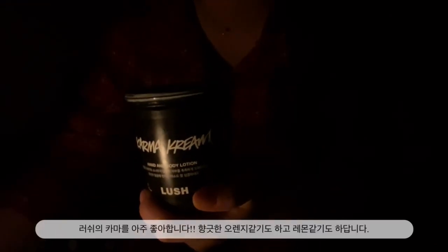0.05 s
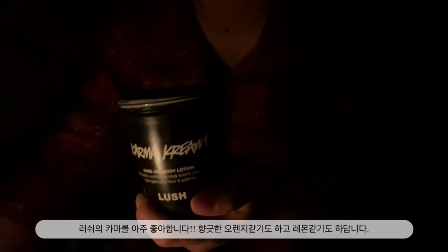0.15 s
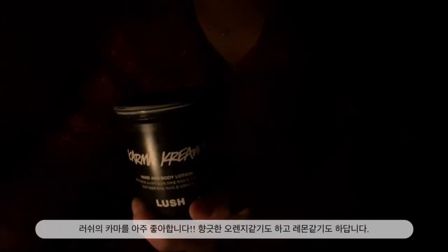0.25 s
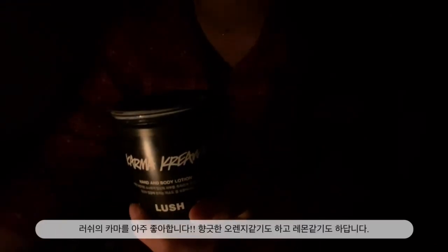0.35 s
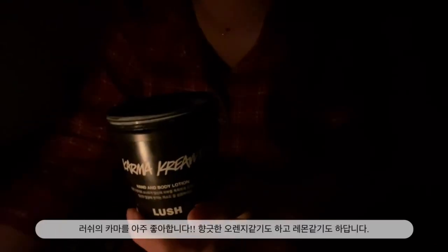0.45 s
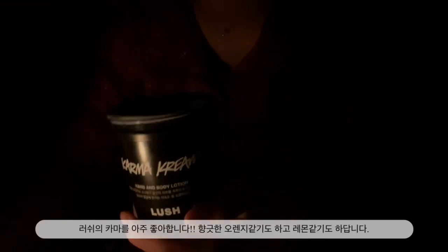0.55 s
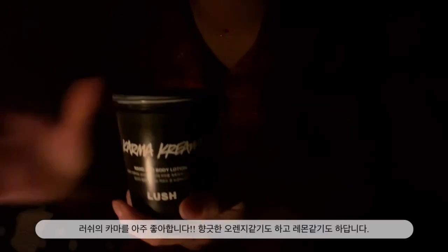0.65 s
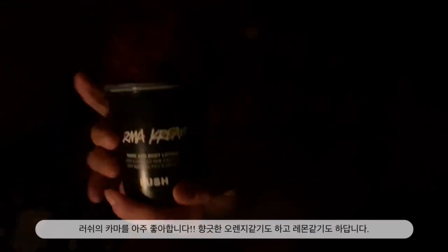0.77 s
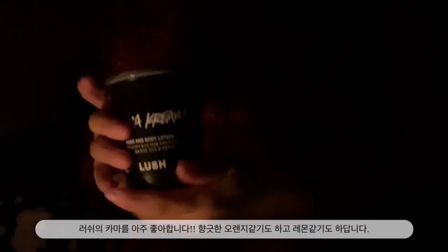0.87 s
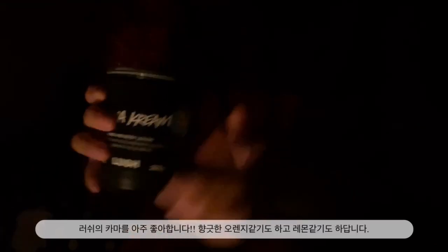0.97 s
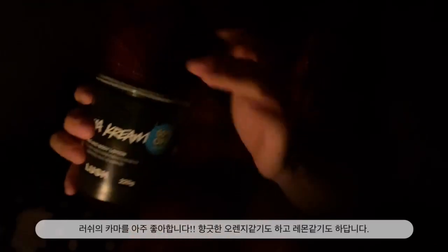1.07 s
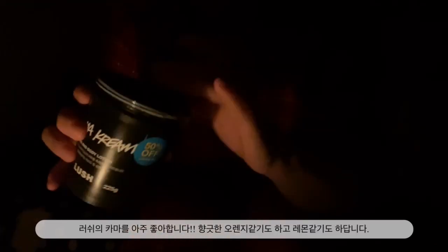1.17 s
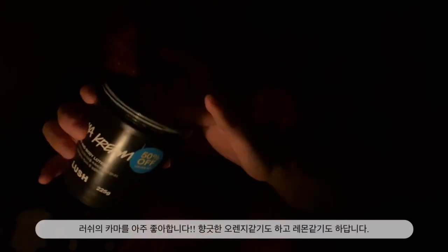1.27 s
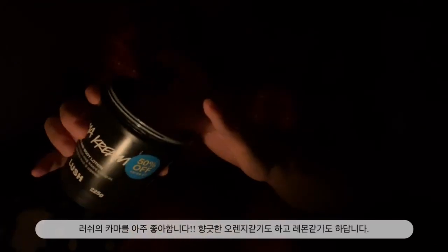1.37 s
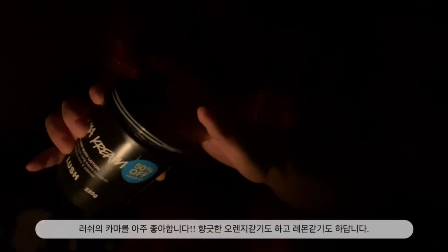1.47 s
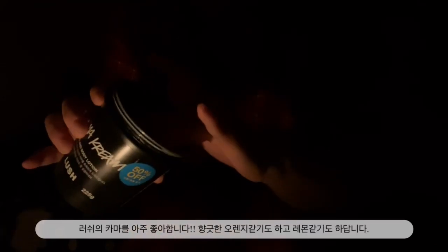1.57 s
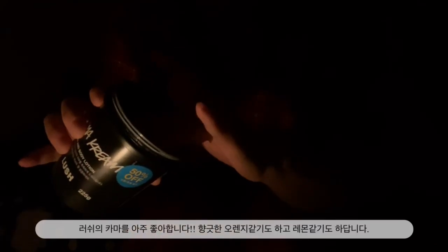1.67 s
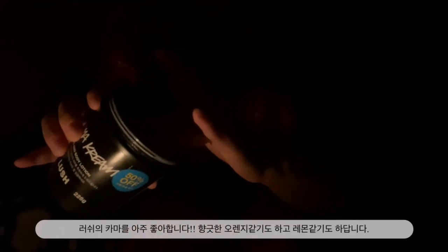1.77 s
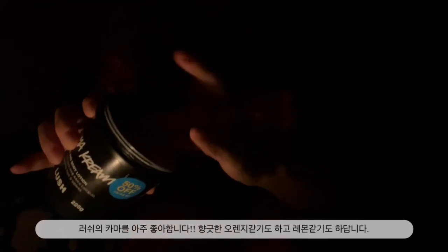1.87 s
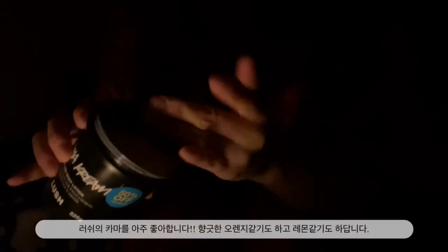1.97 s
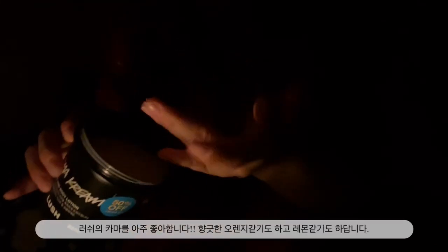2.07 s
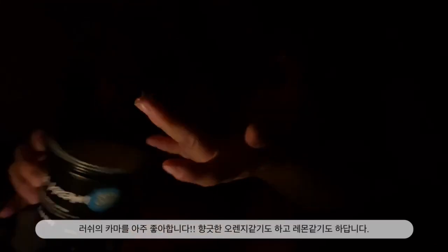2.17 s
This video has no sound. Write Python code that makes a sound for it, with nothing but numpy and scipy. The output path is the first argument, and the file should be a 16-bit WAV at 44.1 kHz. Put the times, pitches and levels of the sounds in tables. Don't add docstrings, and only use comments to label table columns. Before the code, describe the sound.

A plastic tub's screw lid is opened close to stereo microphones. At 0.23 seconds a short click and thread scrape; at 0.43 to 0.51 a louder hollow snap with rapid rattling, then a soft low table thud around 0.52 and a weaker one at 0.67. A brief dry palm slide with a tiny tick comes near 0.9. Quiet hiss and hum remain, with very faint skin rubbing from 1.9.

```python
import sys
import numpy as np
from scipy import signal
from scipy.fft import rfft, irfft, next_fast_len
from scipy.io import wavfile

SR = 44100
rng = np.random.default_rng(int(sys.argv[2]) if len(sys.argv) > 2 else 0)


def bounce(signal):
    frames = np.transpose(np.atleast_2d(signal))
    limited = np.clip(frames, -1, 1)
    pcm = np.round(limited * 32767).astype(np.int16)
    wavfile.write(sys.argv[1], SR, pcm)


def magnitude_from_level(level_db):
    exponent = np.asarray(level_db, float) / 20
    return 10 ** exponent


N = 97020

# (centre [Hz], width [Hz], rms level [dB])
HUM_RESONANCES = [(55.2, 5.9, -64), (96.84, 30, -66), (121.13, 3, -70.5), (252, 12, -86.5)]
# (frequency [Hz], density [dB per Hz])
HISS_SPECTRUM = [(76, -26.5), (130, 0), (147, -26), (238, -18.5), (279, -21), (427, -24), (511, -30),
                 (11400, -50.5), (16000, -62.5)]
# (frequency [Hz], level [dB])
RUMBLE_SPECTRUM = [(20, -32), (35, -8), (70, -0.5), (110, -3), (135, -16.5), (180, -28)]
HISS_DB, RUMBLE_DB = -75 + 5, -67.5
# (frequency [Hz], likeness [0-1])
COHERENCE = [(60, .85), (130, 0.44), (290, 0.71), (640, 0)]
# (frequency [Hz], left over right [dB])
AIR_BALANCE = [(60, 4.5), (110, 4.5), (200, -0.5), (700, -2), (2400, 0.5)]

# (time [s], level [dB])
GRIP_LEVEL = [
    (.765, -100),
    (.772, -73.5),
    (.83, -66.5),
    (.856, -71.5),
    (.872, -56.5),
    (.903, -56.5),
    (.911, -74),
    (.945, -77),
    (1.1, -90),
]
# (frequency [Hz], level [dB])
GRIP_SPECTRUM = [(700, -10), (1500, -9), (2400, -2.5), (4000, -4), (6800, -1), (9500, -2.5), (12000, 0),
                 (15500, -2)]
GRIP_DULL_POWER = 0.7
# (time [s], level [dB])
RUB_LEVEL = [
    (1.84, -105),
    (1.93, -86.5),
    (2.02, -81),
    (2.045, -83.5),
    (2.07, -90),
    (2.12, -82),
    (2.16, -83),
    (2.2, -92),
]
# (frequency [Hz], level [dB])
SKIN_SPECTRUM = [(2000, -22.5), (5000, -9), (8300, -0.5), (10500, -1.5), (13000, 0.5), (15500, -8)]
# (time [s], level [dB], frequency [Hz], decay [cycles])
SKIN_TICKS = [
    (.1916, -43, 14400, 7.3),
    (.825, -64, 1830, 17),
    (.9010, -35, 14200, 28),
    (.9720, -58.5, 5870, 25),
]

# (time [s], strength [dB], crack [dB], hollow modes [dB], body [0 seated, 1 loose, 2 tilted])
LID_CONTACTS = [(.2290, -44, -12, -8.5, 0), (0.2367, -19.5, -9, -7, 0), (0.2377, -18.5, -19, 2.5, 0),
                (.2450, -34.5, -14, -3, 0), (0.4282, -30, -20, -4.5, 1), (0.4342, -10.5, -3, -8, 1),
                (0.4359, -12.5, -9.5, -1, 1), (.4390, -18, -16, -1.5, 1), (0.4458, -24.5, -10.5, -3.5, 1),
                (0.4502, -24.5, -10.5, 0.5, 1), (0.4581, -25, -13.5, -4.5, 1),
                (0.4643, -23.5, -3.5, -6.5, 1), (0.4661, -21.5, -10.5, 1, 1), (0.4705, -26.5, -16, 7, 1),
                (0.4817, -16.5, -2.5, -9, 2), (.4828, -16.5, -14, 1, 2), (.4885, -25, -14.5, -4.5, 2),
                (0.4988, -25.5, -11, 1.5, 2), (.5070, -31.5, -12.5, 0, 2)]
# (frequency [Hz], level [dB], t60 [s], left over right [dB])
SEATED_MODES = [(275, -15, 0.061, 8), (455, -19, 0.075, 4), (645, -2, 0.013, 6.5), (750, -4, 0.03, 4),
                (884, -16, 0.05, -5.5), (1010, -13, .03, -3.5), (1650, -1.5, 0.03, 7),
                (1970, -5, .016, -4.5), (2480, -7, 0.02, 3.5), (2896.7, -6.5, .016, 5),
                (3202.5, -2.5, 0.02, 4.5), (3620, -9.5, 0.033, 2), (4700, -15, 0.013, 2)]
# (frequency [Hz], level [dB], t60 [s], left over right [dB])
LOOSE_MODES = [(267.4, -15.5, 0.12, 6.5), (686, -9, 0.085, 4), (881, -14.5, 0.056, -2),
               (991, -1.5, 0.045, -5), (1078.5, -7.5, 0.028, -3.5), (1599.5, -7, 0.029, 5),
               (1950.4, -4.5, .024, 3), (2346, -5.5, .018, 4), (2697, 0.5, 0.031, 5.5),
               (3171, -11, 0.024, 3), (3880, -7.5, 0.014, 5.5), (4400, -4, 0.014, 6),
               (6300, -16.5, 0.021, -3.5)]
# (frequency [Hz], level [dB], t60 [s], left over right [dB])
TILTED_MODES = [(182, -15.5, 0.021, 5.5), (282, -9.5, 0.036, 7), (340, -13, 0.056, 5.5),
                (712, -3.5, .045, 5), (890, -6, 0.034, -3), (992, -4, .03, -4), (1108.6, -9, .025, -4),
                (1694, -1.5, 0.025, 2.5), (2170, -1, 0.016, 5), (2380, -6.5, 0.015, 2),
                (2630, -8, .022, 1.5), (3700, -4.5, .014, 2.5), (4830, -9, .014, 1)]
HOLLOW_HZ = 1300
MODE_DETUNE = 0.008
# (frequency [Hz], level [dB])
CRACK_SPECTRUM = [(1500, -13), (3000, -3), (5500, -6.5), (7000, -7), (9000, -3), (10300, -1), (13000, -16),
                  (16000, -22.5)]
CRACK_HOLD_S, CRACK_T60_S = 0.0021, 0.00099
# (time [s], level [dB])
SCRAPE_LEVEL = [
    (.215, -89),
    (.233, -49),
    (.262, -47),
    (.30, -60),
    (.345, -64.5),
    (.415, -55),
    (.428, -44.5),
    (.44, -60.5),
]
# (frequency [Hz], level [dB])
SCRAPE_SPECTRUM = [(350, -19), (800, -0.5), (1300, -14.5), (1900, -3), (2600, -8), (4300, -15.5),
                   (6000, -20.5), (12000, -42.5)]
# (time [s], level [dB])
FINGER_LEVEL = [
    (.238, -61),
    (.30, -71),
    (.34, -89),
    (.39, -73.5),
    (.43, -73.5),
    (.52, -72.5),
    (.57, -76),
]
# (time [s], level [dB])
CLATTER_LEVEL = [
    (.432, -51.5),
    (.438, -34),
    (.46, -39),
    (.478, -43),
    (.50, -40),
    (.53, -59.5),
    (.58, -83),
    (.62, -96),
]
# (frequency [Hz], level [dB])
CLATTER_SPECTRUM = [(260, -12), (520, -26.5), (690, -5), (1000, 0), (1350, -12), (2300, 1), (4300, -4.5),
                    (14000, -35.5)]
LID_LAG_S, PALM_LAG_S = 0.0005, -0.000057

# (time [s], level [dB], frequency [Hz], t60 [s])
TABLE_THUDS = [
    (.235, -49, 93.8, 0.43),
    (.44, -49, 108.6, 0.17),
    (0.523, -38, 92.5, 0.19),
    (.665, -47.5, 91.6, 0.18),
]

# (frequency [Hz], t60 [s])
ROOM_T60 = [(100, 0.18), (300, 0.31), (700, 0.17), (2000, 0.18), (6000, .21), (14000, 0.14)]
# (frequency [Hz], level [dB])
ROOM_SPECTRUM = [(300, 1.5), (700, -3), (2000, 1.5), (6000, -1.5), (11000, -12.5), (15000, -17)]
TUB_ROOM_DB, HAND_ROOM_DB, ROOM_GAP_S = -7, -13, 0.004

MERGE_HZ, MERGE_WIDTH_HZ, IN_STEP_HZ, TURN_HZ = 6790, 500, 11970, 5640
TOP_HZ = 15900


def unit(x):
    return x / np.sqrt(np.mean(x ** 2) + 1e-20)


def along(points, hz):
    f, value = np.transpose(points)
    return np.interp(np.log(hz + 1), np.log(f + 1), value)


def level(rows):
    s, db = np.transpose(rows)
    return magnitude_from_level(np.interp(np.arange(N) / SR, s, db, left=-140, right=-140))


def filtered(x, response):
    size = next_fast_len(x.shape[-1] + 8192)
    spectrum = rfft(x, size) * response(np.fft.rfftfreq(size, 1 / SR))
    return irfft(spectrum, size)[..., :x.shape[-1]]


def apart(x, lag_s):
    sides = np.array([[-1], [1]])
    return filtered(x, lambda hz: np.exp(-1j * np.pi * hz * lag_s * sides))


def friction(spectrum, grain_db, alike):
    slip = 40
    strength = np.repeat(magnitude_from_level(grain_db * rng.standard_normal(N // slip + 1)), slip)[:N]
    a, b = rng.standard_normal((2, N)) * strength
    angle = np.arccos(np.clip(alike, 0, 1)) / 2
    mid, side = np.cos(angle) * a, np.sin(angle) * b
    return unit(filtered(np.array([mid + side, mid - side]), lambda hz: magnitude_from_level(along(spectrum, hz))))


def air():
    hiss, rumble = rng.standard_normal((2, 2, N))
    pair = magnitude_from_level(HISS_DB) * unit(filtered(hiss, lambda f: magnitude_from_level(along(HISS_SPECTRUM, f)) * (f > 100)))
    pair += magnitude_from_level(RUMBLE_DB) * unit(filtered(rumble, lambda f: magnitude_from_level(along(RUMBLE_SPECTRUM, f) - 60 * (f > 250))))
    for hz, width, db in HUM_RESONANCES:
        noise = rng.standard_normal((2, N))
        pair += magnitude_from_level(db) * unit(filtered(noise, lambda f: 1 / (1 + (2 * (f - hz) / width) ** 2)))
    angle = lambda f: np.arccos(np.clip(along(COHERENCE, f), -1, 1)) / 2
    mid, side = filtered(pair, lambda f: np.array([np.cos(angle(f)), np.sin(angle(f))]))
    sides = np.array([[1], [-1]])
    return filtered(np.array([mid + side, mid - side]), lambda f: magnitude_from_level(along(AIR_BALANCE, f) / 2 * sides))


def skin():
    grip = level(GRIP_LEVEL)
    slide = friction(GRIP_SPECTRUM, grain_db=2.5, alike=0.7)
    low = filtered(slide, lambda hz: 1 / (1 + (hz / 2800) ** 6))
    pressed_low = low * (grip / grip.max()) ** GRIP_DULL_POWER
    out = grip * (slide - low + pressed_low) * magnitude_from_level([[-1], [1]])
    out += level(RUB_LEVEL) * friction(SKIN_SPECTRUM, grain_db=0.5, alike=0.5)
    for s, db, hz, cycles in SKIN_TICKS:
        u = np.maximum(np.arange(N) / SR - s, 0)
        rise = 1 - np.exp(-8 * u * hz / cycles)
        out += magnitude_from_level(db - 30 * u * hz / cycles) * rise * np.sin(2 * np.pi * hz * u)
    return out


def tub_ring(modes, hollow_db, t):
    hz, mode_db, t60, pan_db = (column[:, None] for column in np.transpose(modes))
    count = len(hz)
    luck_db = rng.normal(0, 1.5, (2, 14, 1))[:, :count]
    phase = rng.normal(np.pi / 2, 0.4, (2, 14, 1))[:, :count]
    phase[1] = np.where(hz < 800, phase[0] + np.pi * hz * LID_LAG_S, phase[1] + np.pi / 2)
    hz = hz * (1 + MODE_DETUNE * rng.standard_normal((14, 1))[:count])
    sides = np.array([1, -1])[:, None, None]
    gain_db = mode_db + hollow_db * (hz < HOLLOW_HZ) + luck_db + pan_db / 2 * sides
    ring = (magnitude_from_level(gain_db - 60 * t / t60) * np.sin(2 * np.pi * hz * t + phase)).sum(1)
    return ring * (1 - np.exp(-t / 0.00034))


def contact_crack(crack_db, t):
    crack = unit(filtered(rng.standard_normal(len(t)), lambda f: magnitude_from_level(along(CRACK_SPECTRUM, f))))
    return crack * magnitude_from_level(crack_db - 60 * np.maximum(t - CRACK_HOLD_S, 0) / CRACK_T60_S)


def lid():
    out, t = np.zeros((2, N + SR)), np.arange(SR // 8) / SR
    bodies = [SEATED_MODES, LOOSE_MODES, TILTED_MODES]
    for s, db, crack_db, hollow_db, body in LID_CONTACTS:
        contact = tub_ring(bodies[round(body)], hollow_db, t) + contact_crack(crack_db, t)
        start = round(s * SR)
        out[:, start:start + len(t)] += magnitude_from_level(db - 5.5) * contact
    out = out[:, :N]
    clatter = friction(CLATTER_SPECTRUM, grain_db=6.5, alike=0.32)
    out += level(CLATTER_LEVEL) * clatter * magnitude_from_level([[1.5], [-1.5]])
    out += level(SCRAPE_LEVEL) * friction(SCRAPE_SPECTRUM, grain_db=2.0, alike=0.54)
    return out + level(FINGER_LEVEL) * friction(SKIN_SPECTRUM, grain_db=5.0, alike=0.5)


def thuds():
    out = np.zeros(N)
    for s, db, hz, t60 in TABLE_THUDS:
        u = np.maximum(np.arange(N) / SR - s, 0)
        rise = 1 - np.exp(-u / 0.0041)
        out += magnitude_from_level(db - 60 * u / t60) * rise * np.sin(2 * np.pi * hz * u)
    return out * magnitude_from_level([[3], [-3]])


def room(x):
    hz, t, z = signal.stft(rng.standard_normal((2, SR // 2)), SR, nperseg=256)
    decay = magnitude_from_level(-60 * t / along(ROOM_T60, hz)[:, None])
    tail = signal.istft(z * decay, SR, nperseg=256)[1]
    tail = np.pad(tail / np.linalg.norm(tail[0]), ((0, 0), (round(ROOM_GAP_S * SR), 0)))
    answer = signal.fftconvolve(x, tail, axes=1)[:, :N]
    return filtered(answer, lambda f: magnitude_from_level(along(ROOM_SPECTRUM, f)))


def scene():
    tub = apart(lid(), LID_LAG_S)
    hand = apart(skin(), PALM_LAG_S)
    walls = magnitude_from_level(TUB_ROOM_DB) * room(tub) + magnitude_from_level(HAND_ROOM_DB) * room(hand)
    return tub + hand + walls + thuds() + air()


def band_limit(x):
    return signal.sosfilt(signal.butter(12, 16440, fs=SR, output="sos"), x)


def record(dry):
    share = lambda hz: 1 / (1 + np.exp(np.clip((MERGE_HZ - hz) / MERGE_WIDTH_HZ, -50, 50)))
    sides = np.array([[0], [1]])
    turn = lambda hz: np.exp(-2j * np.pi * (hz - IN_STEP_HZ) / TURN_HZ * sides)
    separate = filtered(dry, lambda hz: np.sqrt(1 - share(hz) ** 2))
    shared = filtered(dry[0], lambda hz: share(hz) * turn(hz))
    mix = filtered(separate + shared, lambda hz: 1 / (1 + (hz / TOP_HZ) ** 80))
    return band_limit(mix)


dry = scene()
out = record(dry)
bounce(out)
```